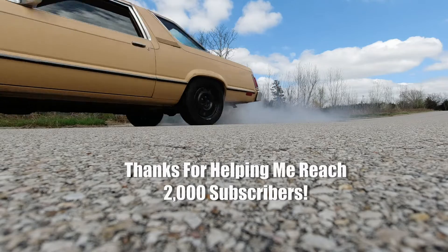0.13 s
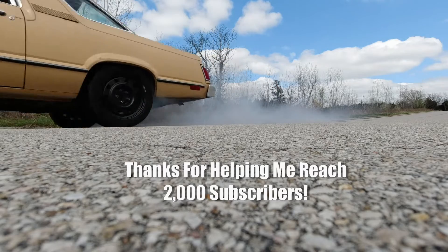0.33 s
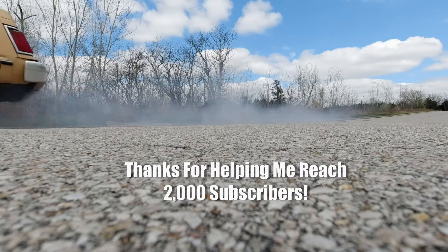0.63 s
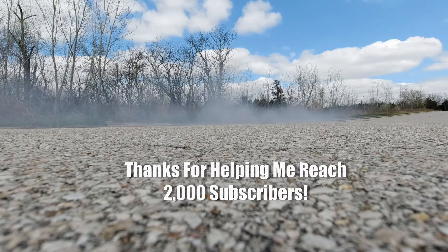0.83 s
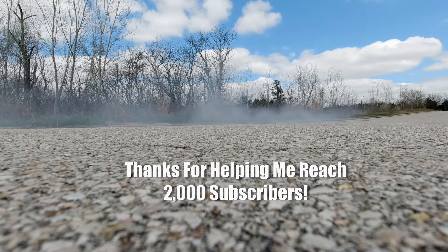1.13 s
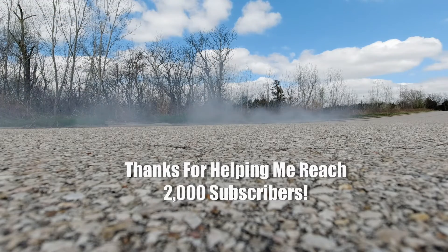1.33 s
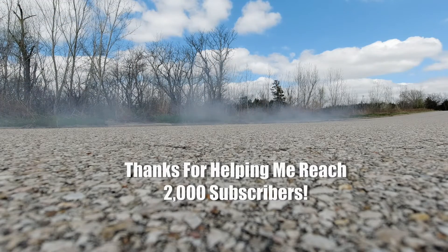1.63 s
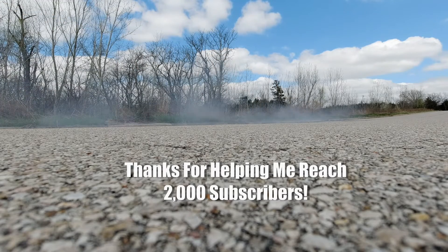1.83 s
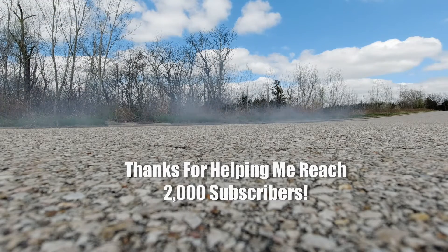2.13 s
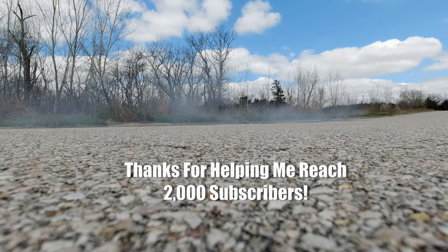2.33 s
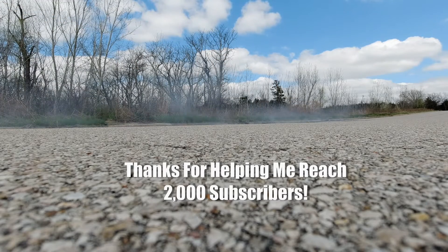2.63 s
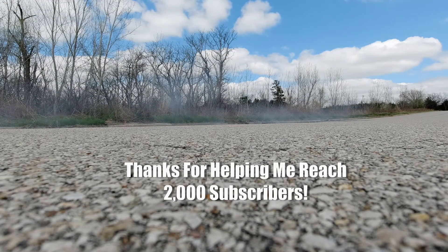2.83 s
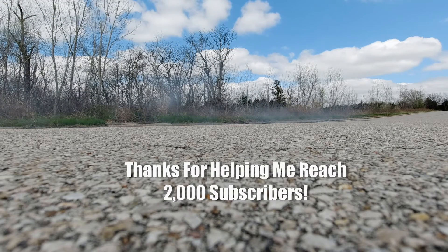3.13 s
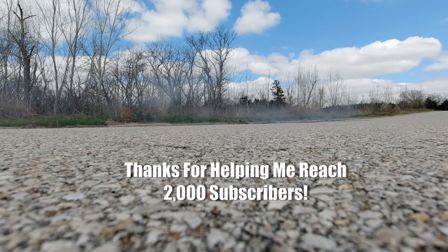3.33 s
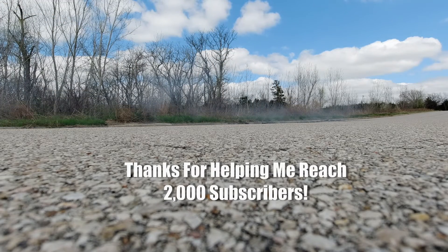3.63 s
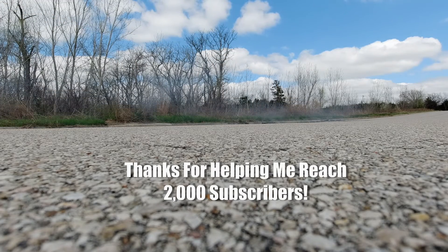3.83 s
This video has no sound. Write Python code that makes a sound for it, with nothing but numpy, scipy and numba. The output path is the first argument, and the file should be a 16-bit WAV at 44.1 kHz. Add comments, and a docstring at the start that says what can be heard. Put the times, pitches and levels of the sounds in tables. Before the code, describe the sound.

Car roars past close by with rear tyres spinning, then lifts off and rolls away

```python
"""On a country road, a car with spinning rear tyres passes a small two-port microphone lying on the ground,
lifts off the throttle and rolls away to the left. The engine is sine waves, pulses ringing in a pipe and
pulsing noise; the tyres are uneven pulses ringing the tread, with filtered noise for scrub, roll and hiss.
A distant rumble and hum of noise, a faint sinking whine and a few soft decaying knocks remain."""
import sys
import numpy as np
from scipy import signal
from scipy.fft import rfft, irfft, next_fast_len
from scipy.io import wavfile
from scipy.ndimage import uniform_filter1d, map_coordinates
from numba import njit

SR = 44100
rng = np.random.default_rng(int(sys.argv[2]) if len(sys.argv) > 2 else 0)


def master_out(mix):
    """Clip the mix to full scale and print it as 16-bit PCM to the path in sys.argv[1]."""
    frames = np.transpose(np.atleast_2d(mix))
    ceiling = np.clip(frames, -1, 1)
    pcm = np.round(ceiling * 32767).astype(np.int16)
    wavfile.write(sys.argv[1], SR, pcm)


def volts_from_decibels(level):
    """Turn decibel levels (scalar or array-like) into linear amplitude factors."""
    exponent = np.asarray(level, float) / 20
    return 10 ** exponent


N = 176400
TIME = np.arange(N) / SR  # s

# Engine cycles per second, half the crank speed: t/s, f/Hz
ENGINE_CYCLE = [(0, 38.4), (.27, 37.8), (.5, 36.6), (.74, 35.1), (.85, 33.6), (.98, 31.5), (1.2, 26.3),
                (1.3, 23.6), (1.42, 21.6), (1.6, 18.4), (2, 15), (4, 13)]
# Clean engine tones: t/s, level/dB, tilt/(dB per order)
ORDER_LEVELS = [(0, -26, 0.16), (.3, -26, 0), (.45, -24.5, -0.16), (.6, -26, 0.35), (.75, -26.5, -0.04),
                (.9, -33, 1.05), (1.05, -35.5, 0.1), (1.2, -40.5, 0.3), (1.4, -43.5, -0.2),
                (1.55, -44, -1.5), (1.7, -58, -4), (2.05, -73.5, -10)]
# Their balance: multiple of the engine cycle, relative level/dB
ENGINE_ORDERS = [(2, -17.5), (3, -15.5), (4, 1.5), (5, -1.5), (6, -11), (8, -18.5), (10, -13), (12, -12)]
SHAFT_RATIO = 1.672  # turns of a second shaft per engine cycle
# Tones of that shaft: multiple of its speed, relative level/dB
SHAFT_ORDERS = [(1, -18.5), (4, -11), (5, -12), (7, -16), (8, -9)]
# Exhaust: t/s, thump level/dB, roar level/dB
EXHAUST_LEVELS = [(0, -54, -26.5), (.3, -44, -25), (.6, -35, -28.5), (.83, -33, -30.5), (1.0, -44, -32),
                  (1.08, -43, -35.5), (1.19, -39.5, -46.5), (1.3, -43.5, -50), (1.45, -45, -50),
                  (1.65, -46, -50.5), (1.82, -43.5, -53), (1.9, -51, -54), (2.5, -56, -59.5),
                  (3.2, -59.5, -63.5), (4, -61, -70)]
# Strength of each cylinder's blow in firing order: relative level/dB
CYLINDER_LEVELS = [-0.5, -10, -6, 1.5, -1.5, -7.5, -6.5, -4.5]
# Ringing modes of the exhaust pipe: f/Hz, width/Hz, relative level/dB
PIPE_MODES = [(48, 34, -6.5), (80, 23, -6), (119, 19, -2), (205, 51, -4.5), (310, 200, -13.5)]
# Colour of the exhaust roar: f/Hz, relative level/dB
ROAR_COLOUR = [(100, -15), (200, -1.5), (400, -3.5), (700, -1.5), (1200, -1), (2000, -12), (3000, -21),
               (5000, -45)]
BOOMY_S, BOOMY_FADE_S = 1.5, 0.15  # the slowing engine turns boomy and unsteady around this time, this gradually
BOOM_DB, BOOMY_WOBBLE = 9, 0.006  # then: gain of the lowest pipe mode, extra wobble as a share of the speed

# Tyres: t/s, low judder level/dB, high judder level/dB, scrub level/dB, hiss level/dB
TYRE_LEVELS = [(0.0, -36, -22, -28.5, -46.5), (0.31, -32.5, -21, -30, -44.5), (0.44, -41, -25, -32, -46.5),
               (0.47, -27.5, -23, -32, -50.5), (0.51, -75, -27, -32.5, -49.5),
               (0.58, -29, -20.5, -38.5, -49.5), (0.63, -25, -25.5, -38, -51.5),
               (0.67, -27.5, -23.5, -39, -54), (0.79, -22.5, -20.5, -42, -56),
               (0.83, -22, -23, -42.5, -54.5), (0.96, -35.5, -27.5, -46.5, -61),
               (1.03, -33, -33.5, -48.5, -66), (1.1, -45, -39, -49, -66), (1.15, -39, -40, -55, -71.5),
               (1.22, -50, -63.5, -57.5, -75.5), (1.44, -57, -64, -58.5, -73),
               (1.9, -65, -59.5, -73.5, -85.5), (2.4, -81, -67.5, -78.5, -92)]
SLIP_HZ, SLIP_SCATTER, SLIP_DB = 693.6, 0.35, 4.5  # mean slips per s, scatter in gaps, scatter of size in dB
# Low and high ringing modes of the tread: f/Hz, width/Hz, relative level/dB
LOW_TREAD_MODES = [(671.4, 67, -4), (712, 41, -3), (785, 80, -9)]
HIGH_TREAD_MODES = [(1439, 83, -7), (1551.6, 73, -0.5), (1641, 34, -6), (1759, 42, -8.5), (2170, 76, -17.5)]
# A band that sinks as the tyres pass: t/s, f/Hz, level/dB
SINKING_BAND = [(0, 1400, -39), (.22, 1350, -30), (.4, 1250, -33), (.56, 1110, -33.5), (.7, 960, -36),
                (1, 850, -47), (1.2, 800, -80)]
GRIP_S, GRIP_FADE_S = 1.182, 0.012  # the tyres stop spinning around this time, this gradually
# Colours of scrubbing rubber, rolling tyres and hiss: f/Hz, relative level/dB
SCRUB_COLOUR = [(1000, -23.5), (2000, 3), (3000, 2), (4500, -7.5), (6500, -22), (9000, -44.5)]
ROLL_COLOUR = [(1500, -4.5), (2400, 7.5), (3000, 3), (4300, -1), (6000, -10), (7500, -23), (9000, -23)]
HISS_COLOUR = [(5000, -11), (7200, -12.5), (9800, -2.5), (11500, -11.5), (14000, -24), (16000, -16.5)]

# Colour of the distant rumble: f/Hz, relative level/dB
RUMBLE_COLOUR = [(15, -35.5), (28, -13), (124, -2), (156, -9.5), (249, -6.5), (323, -16.5), (397, -11.5),
                 (440, -22.5), (1200, -32.5), (2240, -36.5), (12000, -84.5), (15600, -93), (22000, -120)]
RUMBLE_DB, HUM_HZ, HUM_DB = -56, 124.7, -60
# Sinking whine: t/s, f/Hz, level/dB
WHINE = [(1.6, 272, -59), (2.2, 265.6, -62.5), (3, 255, -69.5), (4, 243, -72.5)]
SQUEAK_S, SQUEAK_LENGTH_S = 1.297, 0.03
# Noise bands of the squeak: f/Hz, width/Hz, level/dB
SQUEAK_BANDS = [(1000, 200, -48), (6050, 250, -54)]
# Soft knocks: t/s, level/dB before the soft onset, f/Hz
KNOCKS = [(1.75, -42, 213), (1.756, -45, 376), (1.809, -49, 132), (1.815, -39, 373), (2.055, -39, 129),
          (2.592, -51, 396), (2.999, -47.5, 395), (3.372, -49, 387)]
KNOCK_T60_S = 0.089  # time to fade by 60 dB

# Sound scattered by the verge: f/Hz, level/dB against the direct sound
VERGE_COLOUR = [(30, -20.5), (200, -19), (500, -12.5), (1200, -13), (2500, -10.5), (5000, 3), (9000, 3.5)]
PASS_S, TURN_S = 0.6, 0.36  # middle and time scale of the pass
MID_LAG_S, PORT_LAG_S, FAR_LAG_S = 9e-5, 0.000096, 1.4e-4  # right port: lag mid-pass, its swing, lag far away


def column(table, k):
    """One column of a time table, sample by sample."""
    rows = np.array(table, float)
    return np.interp(TIME, rows[:, 0], rows[:, k])


def unit(x):
    """Scale to an rms (average strength) of 1."""
    return x / np.sqrt(np.mean(x ** 2))


def shape(x, points):
    """Filter a sound by a curve through (f/Hz, level/dB) points."""
    rows = np.array(points, float)
    size = next_fast_len(N + 8192)
    hz = np.maximum(np.arange(size // 2 + 1) * SR / size, 1)
    gain = volts_from_decibels(np.interp(np.log(hz), np.log(rows[:, 0]), rows[:, 1]))
    return irfft(rfft(x, size) * gain, size)[:N]


def colour(x, points):
    """Filter, then scale to rms 1."""
    return unit(shape(x, points))


def walk(rate):
    """A smooth random curve around 0 with spread near 1: levels held 1 / rate s, smoothed twice."""
    hold = int(SR / rate)
    steps = np.repeat(rng.standard_normal(N // hold + 1), hold)
    smooth = uniform_filter1d(uniform_filter1d(steps, hold), hold)
    return 1.3 * smooth[:N]


@njit
def svf(x, hz, width):
    """State-variable band-pass with a moving centre, gain 1 there."""
    y, band, low = np.empty(len(x)), 0., 0.
    for i in range(len(x)):
        g, k = np.tan(np.pi * hz[i] / SR), width / hz[i]
        v = (band + g * (x[i] - low)) / (1 + g * (g + k))
        band, low, y[i] = 2 * v - band, low + 2 * g * v, k * v
    return y


def resonate(x, first_hz, first_width, second_hz, second_width):
    """Ring through two band-passes in a row, then scale to rms 1."""
    once = svf(x, first_hz + np.zeros(N), float(first_width))
    return unit(svf(once, second_hz + np.zeros(N), float(second_width)))


def pulses(hz, scatter, scatter_db, pattern_db=(0,)):
    """A pulse train with scattered gaps and sizes; also the share of each regular gap that has passed."""
    turns = np.cumsum(hz) / SR
    chance = rng.standard_normal((int(turns[-1]), 2))
    count = np.arange(len(chance))
    at = np.interp(count + scatter * chance[:, 0], turns, np.arange(N)).astype(int)
    size_db = scatter_db * chance[:, 1] + np.array(pattern_db)[count % len(pattern_db)]
    out = np.zeros(N)
    np.add.at(out, at, volts_from_decibels(size_db))
    return out - out.mean(), turns % 1


def engine_orders(cycle_hz):
    """Turning parts sound at fixed multiples of their speed; each tone wavers in level."""
    turns = np.cumsum(cycle_hz) / SR
    clean = 0
    for k, db in ENGINE_ORDERS + [(SHAFT_RATIO * k, db) for k, db in SHAFT_ORDERS]:
        level = volts_from_decibels(db + k * column(ORDER_LEVELS, 2) + .28 * k * walk(12))
        clean = clean + level * np.sin(2 * np.pi * (k * turns + rng.random()))
    clean /= np.sqrt(uniform_filter1d(clean ** 2, size=SR // 3))  # even out the overall level
    return clean * volts_from_decibels(column(ORDER_LEVELS, 1))


def exhaust_thumps(fire, boomy):
    """Uneven firings push on the gas and ring the pipe; its lowest mode booms for a while."""
    push = uniform_filter1d(uniform_filter1d(fire, size=60), size=70)  # each blow is soft
    boom_db = BOOM_DB * boomy * np.clip(2.6 - TIME, 0, 1)
    thump = 0
    for i, (hz, width, db) in enumerate(PIPE_MODES):
        level = volts_from_decibels(db + boom_db * (i == 0))
        thump = thump + level * resonate(push, hz, width, hz, 2 * width)
    return unit(thump) * volts_from_decibels(column(EXHAUST_LEVELS, 1))


def exhaust_roar(phase, boomy):
    """Rushing gas is noise that swells once a firing; its level flutters less once the engine is boomy."""
    swell = 0.3 + np.exp(-phase / 0.57)
    roar = colour(swell * rng.standard_normal(N), ROAR_COLOUR)
    flutter = volts_from_decibels((2.01 - 1.0 * boomy) * walk(20))
    return roar * flutter * volts_from_decibels(column(EXHAUST_LEVELS, 2))


def engine():
    """One wavering engine speed drives the orders, the thumps and the roar."""
    # 0 before, 1 after the change to a boomy, unsteady engine
    boomy = 1 / (1 + np.exp((BOOMY_S - TIME) / BOOMY_FADE_S))
    cycle_hz = column(ENGINE_CYCLE, 1) * (1 + (.0015 + BOOMY_WOBBLE * boomy) * walk(12))
    fire, phase = pulses(len(CYLINDER_LEVELS) * cycle_hz, .28, 3.0, CYLINDER_LEVELS)
    return engine_orders(cycle_hz) + exhaust_thumps(fire, boomy) + exhaust_roar(phase, boomy)


def tread_judder(slip, modes, level_column):
    """Each slip rings the tread modes, which flicker in level and waver in pitch."""
    ring = 0
    for hz, width, db in modes:
        wavering_hz = hz * (1 + .02 * walk(18))
        ring = ring + volts_from_decibels(db + 2.76 * walk(30)) * resonate(slip, wavering_hz, width, hz, 3.8 * width)
    return unit(ring) * volts_from_decibels(column(TYRE_LEVELS, level_column) + 1.6 * walk(25))


def sinking_band(slip):
    """The same slips ring a band whose pitch sinks as the tyres pass."""
    hz = column(SINKING_BAND, 1)
    return resonate(slip, hz, 140, hz, 220) * volts_from_decibels(column(SINKING_BAND, 2) + 3.8 * walk(18))


def tyre_noise(spin):
    """Noise of scrubbing rubber gives way to rolling noise when the tyres grip; hiss lies on top."""
    scrub, roll, hiss = (colour(rng.standard_normal(N), points)
                         for points in (SCRUB_COLOUR, ROLL_COLOUR, HISS_COLOUR))
    contact = np.sqrt(spin) * scrub + np.sqrt(1 - spin) * roll
    fade = volts_from_decibels(-12 * np.maximum(TIME - TYRE_LEVELS[-1][0], 0))  # 12 dB per s after the last table row
    out = 0
    for k, noise in ((3, contact), (4, hiss)):
        out = out + noise * volts_from_decibels(column(TYRE_LEVELS, k) + 2.1 * walk(18)) * fade
    return out


def tyres():
    """Spinning rubber sticks and slips in uneven steps until it grips; noise continues under it."""
    spin = 1 / (1 + np.exp(np.clip((TIME - GRIP_S) / GRIP_FADE_S, -50, 50)))  # 1 spinning, 0 gripping
    low_slip, high_slip = (pulses(SLIP_HZ * (1 + .1 * walk(20)), SLIP_SCATTER, SLIP_DB)[0]
                           for _ in range(2))
    judder = tread_judder(low_slip, LOW_TREAD_MODES, 1) + tread_judder(high_slip, HIGH_TREAD_MODES, 2)
    return (judder + sinking_band(high_slip)) * spin + tyre_noise(spin)


def rumble():
    """Distant rumble: filtered noise with a slightly wavering level."""
    return colour(rng.standard_normal(N), RUMBLE_COLOUR) * volts_from_decibels(RUMBLE_DB + 0.57 * walk(8.7))


def hum():
    """A narrow band of noise that wavers in pitch and level."""
    tone = resonate(rng.standard_normal(N), HUM_HZ + 3 * walk(6.8), 17, HUM_HZ, 43)
    return volts_from_decibels(HUM_DB + 1.5 * walk(2.4)) * tone


def whine():
    """A faint sine wave whose pitch sinks."""
    turns = np.cumsum(column(WHINE, 1)) / SR
    return volts_from_decibels(column(WHINE, 2) + 1.5 * walk(7.9)) * np.sin(2 * np.pi * turns)


def squeak():
    """One short puff of narrow noise bands, quick to rise and slower to fall."""
    puff = np.sin(np.pi * np.sqrt(np.clip((TIME - SQUEAK_S) / SQUEAK_LENGTH_S, 0, 1)))
    bands = sum(volts_from_decibels(db) * resonate(rng.standard_normal(N), hz, width, hz, width)
                for hz, width, db in SQUEAK_BANDS)
    return puff * bands


def knocks():
    """Each knock is a sine wave with a soft onset that dies away."""
    out = np.zeros(N)
    for start, db, hz in KNOCKS:
        age = np.maximum(TIME - start, 0)
        onset = 1 - np.exp(-age / 0.0033)
        out += volts_from_decibels(db - 60 * age / KNOCK_T60_S) * onset * np.sin(2 * np.pi * hz * age)
    return out


def car():
    """Add up all the sources, with fresh random draws at each call."""
    return engine() + tyres() + rumble() + hum() + whine() + squeak() + knocks()


def scene():
    """The right port hears the leaving car late; scattered sound, mostly treble, is unrelated at the ports."""
    near_lag = MID_LAG_S + PORT_LAG_S * np.sin(np.arctan((TIME - PASS_S) / TURN_S))
    lag = uniform_filter1d(np.where(TIME < 1.6, near_lag, FAR_LAG_S), size=SR // 3)
    left = car()
    right = map_coordinates(left, [(TIME - lag) * SR], mode="mirror")
    return np.array([port + shape(car(), VERGE_COLOUR) for port in (left, right)])


def roll_off(x):
    """The treble ends steeply here."""
    return signal.sosfilt(signal.butter(12, 15660, fs=SR, output="sos"), x)


def record(dry):
    """Take the two port signals as the finished mix."""
    return roll_off(dry)


dry = scene()
out = record(dry)
master_out(out)
```